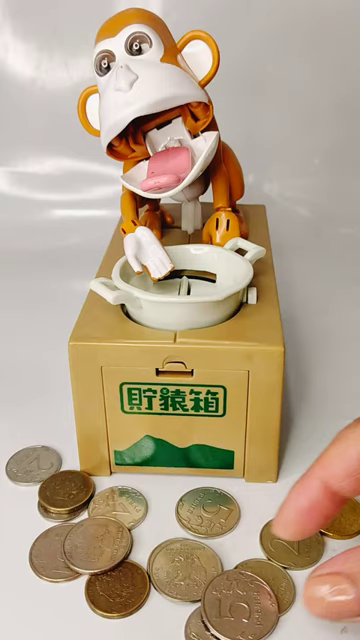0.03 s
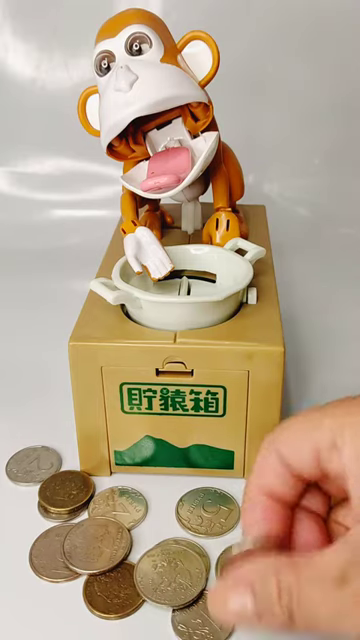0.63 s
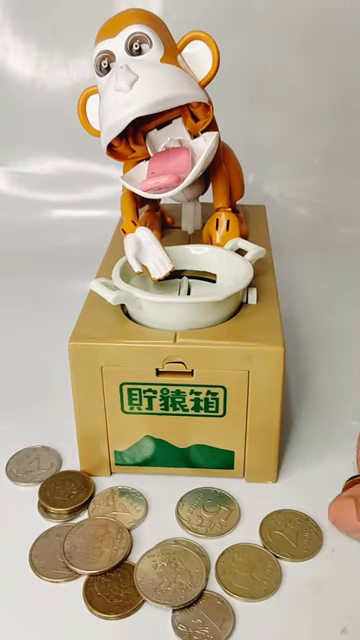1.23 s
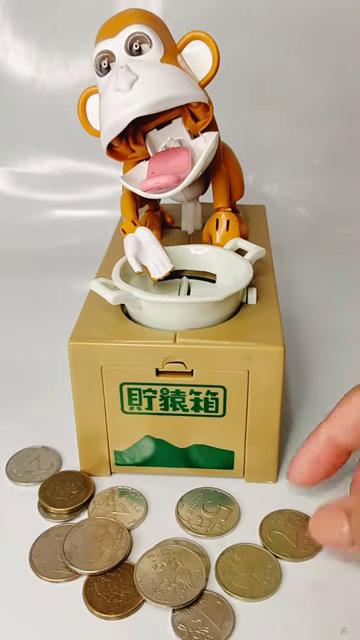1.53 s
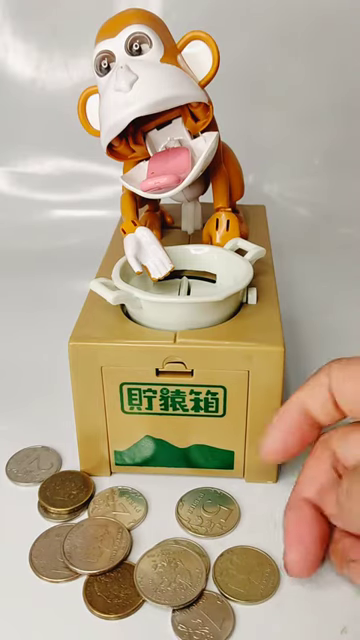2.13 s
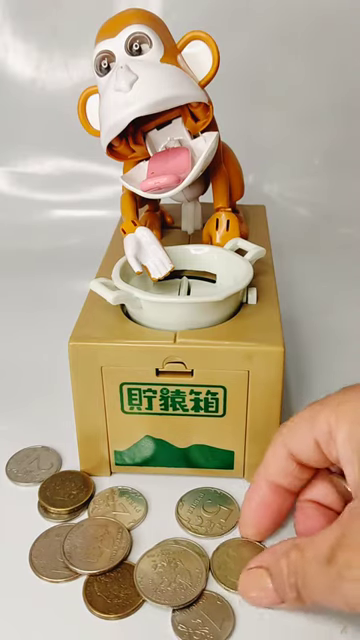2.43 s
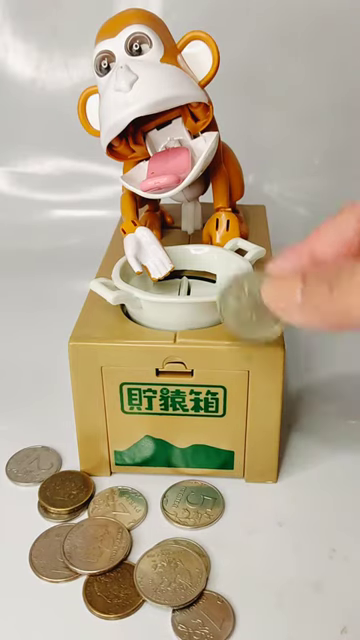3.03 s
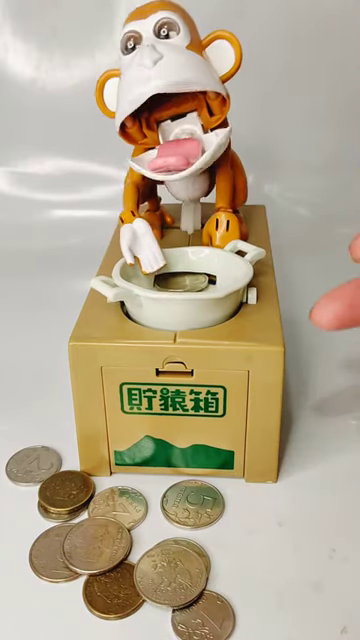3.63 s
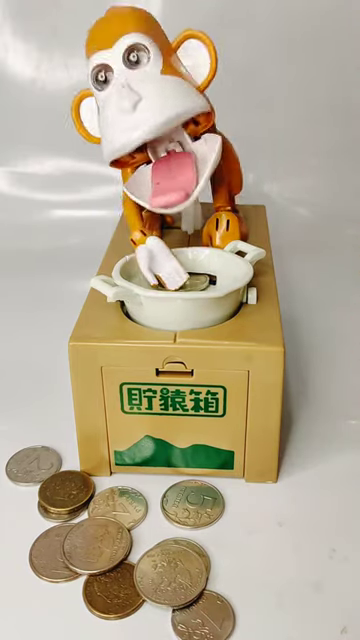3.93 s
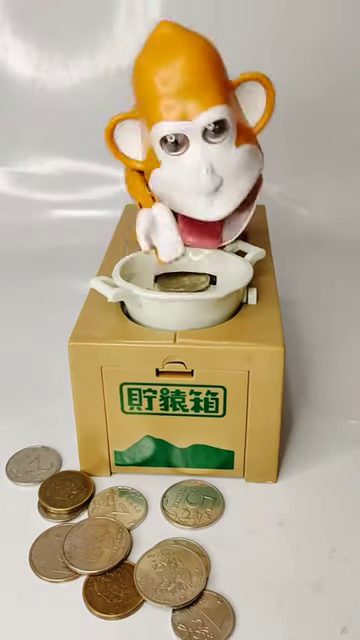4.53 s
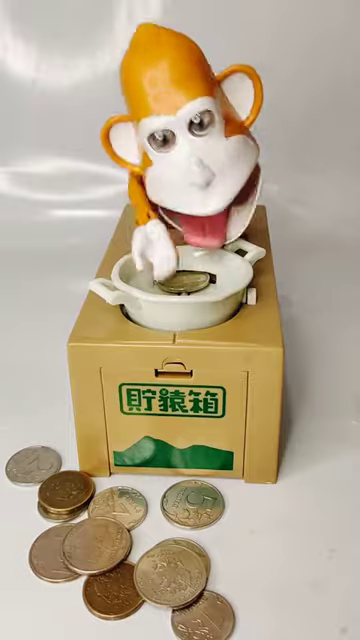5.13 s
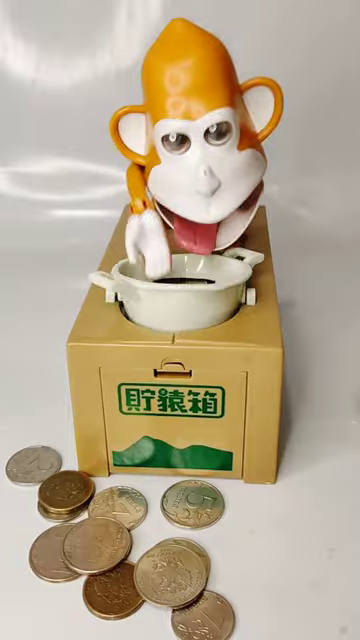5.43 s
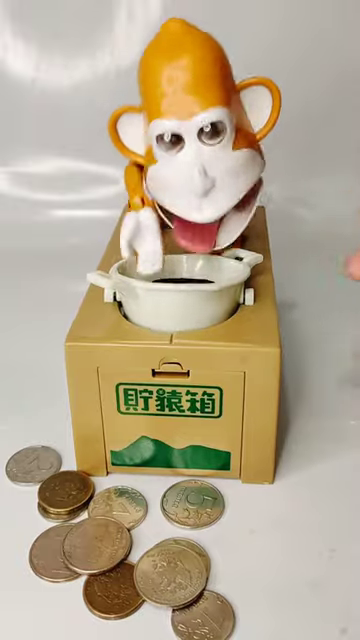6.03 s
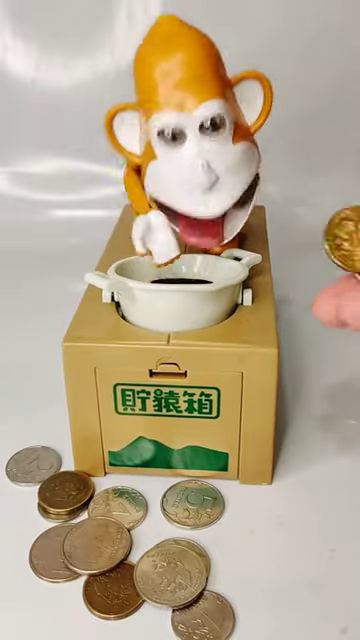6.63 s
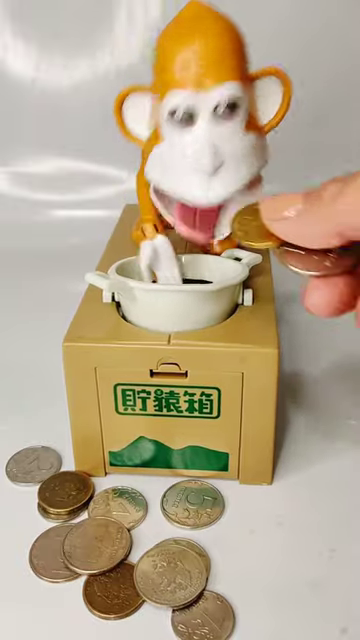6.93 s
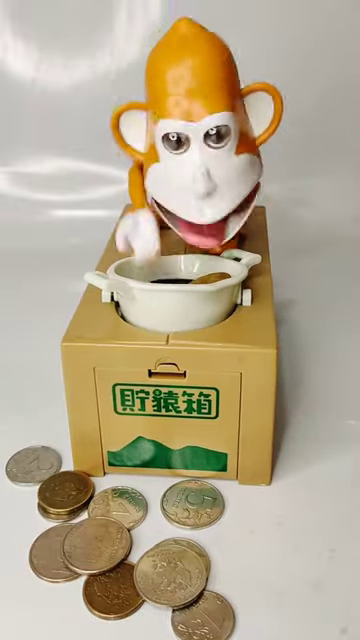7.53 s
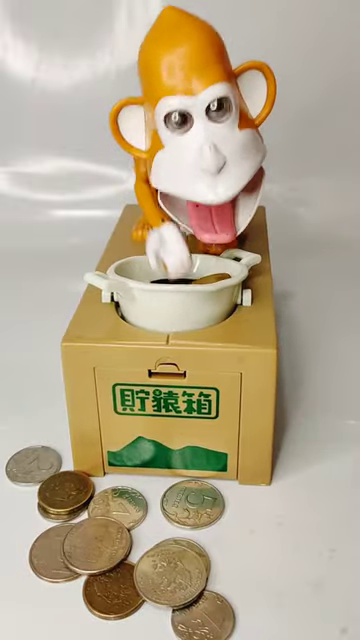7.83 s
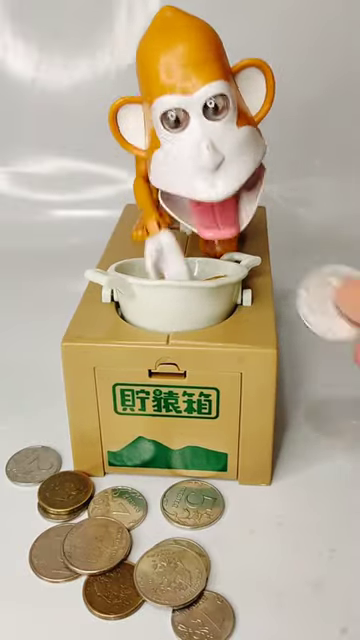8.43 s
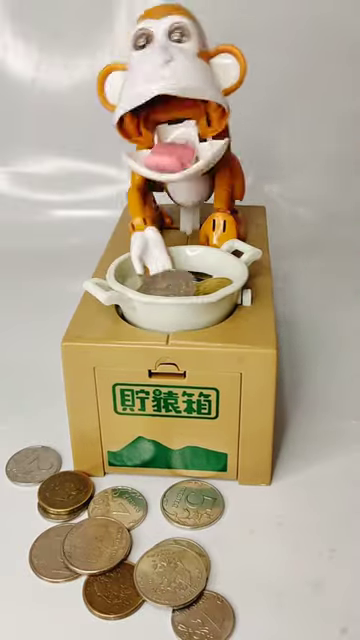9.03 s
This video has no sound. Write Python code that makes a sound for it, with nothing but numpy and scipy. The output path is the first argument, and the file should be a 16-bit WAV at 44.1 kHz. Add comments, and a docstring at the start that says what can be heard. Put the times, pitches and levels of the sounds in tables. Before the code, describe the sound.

Coins clink on a table, then drop into a plastic toy bank whose motor starts up, rattling, grinding and clacking.

```python
"""Coins into a motorised toy money box.

Coins clink in a heap on a hard table, then fall into a plastic dish, bounce and ring.
The first starts the motor: loose gears rattle in the hollow box and grind at each stroke of the figure.
Levers knock and more coins land; a phone stands close by in a small room."""
import sys
import numpy as np
from scipy import signal
from scipy.fft import rfft, irfft
from scipy.io import wavfile
from scipy.ndimage import uniform_filter1d

SR = 44100
rng = np.random.default_rng(int(sys.argv[2]) if len(sys.argv) > 2 else 0)


def put_to_file(sound):
    """Save the sound as 16-bit audio at rate SR, in the file named by the first command-line argument."""
    columns = np.atleast_2d(sound).T  # one column per channel
    safe = np.clip(columns, -1, 1)
    whole_steps = np.round(safe * 32767)
    wavfile.write(sys.argv[1], SR, whole_steps.astype(np.int16))


N = 410130
TOP_HZ = 14200
TIME = np.arange(N) / SR
FREQ = np.maximum(np.linspace(0, SR / 2, 4097), 1)

# coin hits in the heap: start_s, level_db, chatter_s, ring_db
CLINKS = [(0.2658, -14, 0.0053, -8), (0.3123, -5.5, 0.0022, -2.5), (.614, -19.5, 0.0035, -10),
          (0.64, -21.5, 0.002, -8), (0.8357, -16, 0.0036, -3), (0.846, -17.5, 0.0062, 4),
          (0.864, -25, 0.0036, 7), (0.877, -17.5, 0.0039, 3), (.909, -19, 0.0015, 5),
          (0.958, -27.5, 0.01, 4), (0.974, -10.5, 0.0011, -7.5), (0.9822, -24, 0.00093, -6),
          (1.007, -25, 0.005, -9), (1.111, -32, 0.001, -15), (1.32, -27.5, 0.0041, -20),
          (1.4244, -9, 0.0017, 3), (1.467, -5, 0.0015, 4), (1.478, -32, 0.009, 6), (1.542, -36, 0.082, -13),
          (1.592, -17, 0.008, -2), (1.929, -26.5, 0.0022, -19), (2.0932, -15, 0.0094, 1.5),
          (2.142, -12.5, 0.0038, -1), (2.149, -10.5, 0.0023, -11), (2.246, -24, 0.009, -25),
          (2.267, -24.5, 0.0036, -20), (2.867, -39.5, 0.0049, -20)]
# small coin modes: pitch_hz, level_db, t60_s
SMALL_COIN_MODES = [(8700, -14, .15), (9950, -11, .12), (12870, 0, .11), (13030, -2, .09), (13200, -9, .06)]
# spectrum of a hit on plastic: freq_hz, gain_db
PLASTIC_SPECTRUM = [(100, -0.5), (800, -3), (1100, -5.5), (2500, 0), (4500, 0), (7000, 5.5), (9500, 13.5),
                    (11500, 8), (14000, -3.5)]
# dish resonances: centre_hz, width_hz, gain_db
DISH_RESONANCES = [(521.4, 48, 2.5), (709, 56, 3), (774, 53, 8.5), (855, 34, 9.5), (1190, 84, -1),
                   (1430, 640, -10)]
# hollow box resonances: centre_hz, width_hz, gain_db
BOX_RESONANCES = [(51.6, 20, -12.5), (107.4, 12, -3), (186.4, 8.6, 4), (211, 13, -5), (244.8, 16, -2),
                  (279, 5.7, 2.5), (364.4, 39, -9), (437, 6.4, -12)]


def undb(db):
    """Decibels to gain."""
    return 10 ** (np.asarray(db) / 20)


def unit(x):
    """Scale to rms 1."""
    return x / np.sqrt(np.mean(x ** 2))


def span(start_s, t):
    """Samples of an event with time axis t."""
    return slice(int(start_s * SR), int(start_s * SR) + len(t))


def highpass(x, hz):
    """First-order high-pass."""
    return signal.lfilter(*signal.butter(1, hz, "high", fs=SR), x)


def band(x, hz, width_hz):
    """One steep-skirted resonance, output at rms 1."""
    b, a = signal.iirpeak(min(hz, TOP_HZ), max(hz / width_hz, .8), fs=SR)
    return unit(signal.lfilter(b, a, signal.lfilter(b, a, x)))


def curve(points):
    """Gain over FREQ from points of freq_hz, gain_db."""
    hz, db = np.transpose(points)
    return undb(np.interp(np.log(FREQ), np.log(hz), db))


def resonances(rows):
    """Gain over FREQ of resonances summed in power."""
    powers = (undb(2 * db) / (1 + ((FREQ / hz - hz / FREQ) * hz / width_hz) ** 2)
              for hz, width_hz, db in rows)
    return np.sqrt(sum(powers))


def colour(x, gain):
    """Minimum-phase filter, scaled to keep the power of white noise below TOP_HZ."""
    cepstrum = irfft(np.log(gain / np.sqrt(np.mean(gain[FREQ < TOP_HZ] ** 2))))
    cepstrum[1:len(gain) - 1] *= 2
    cepstrum[len(gain):] = 0
    impulse = irfft(np.exp(rfft(cepstrum)))
    return signal.oaconvolve(x, impulse[None], axes=1)[:, :N]


def ring(x, modes):
    """Contacts in x excite decaying modes."""
    t = TIME[:SR // 2]
    tone = sum(undb(db - 60 * t / t60_s) * np.sin(2 * np.pi * hz * t) for hz, db, t60_s in modes)
    return signal.fftconvolve(x, tone[None] / np.linalg.norm(tone), axes=1)[:, :N]


def wander(rate_hz):
    """Smooth random drift, rms 1."""
    hold = max(int(SR / rate_hz), 1)
    steps = np.repeat(rng.standard_normal(N // hold + 1), hold)
    return unit(uniform_filter1d(steps, hold)[:N])


def swells(rows):
    """Sum of Gaussian bumps in dB."""
    out = np.zeros(N)
    for middle_s, db, half_s in rows:
        near = slice(*np.searchsorted(TIME, [middle_s - 4 * half_s, middle_s + 4 * half_s]))
        out[near] += db * np.exp(-((TIME[near] - middle_s) / half_s) ** 2)
    return out


def contacts(size, rate_hz, spread_db, lag_s=.00009):
    """Tiny random impacts from scattered spots, each with its own lag to the two microphone ports."""
    count = int(size * rate_hz / SR) + 1
    at = rng.integers(0, size, count)
    force = rng.choice([-1, 1], count) * undb(spread_db * rng.standard_normal(count))
    lags = np.rint(lag_s * SR * rng.standard_normal((2, count))).astype(int)
    return unit(np.array([np.bincount(np.clip(at + lag, 0, size - 1), force, size) for lag in lags]))


def blows(rows, rate_hz, rise_s=.0005):
    """Each blow is a brief chatter of contacts; extra columns give copies weighted in dB."""
    out, t = np.zeros((len(rows[0]) - 2, 2, N + SR)), TIME[:SR // 8]
    for start_s, db, chatter_s, *copies_db in rows:
        fade = np.exp(-(t / chatter_s) ** 1.13) * (1 - np.exp(-t / rise_s))
        burst = contacts(len(t), rate_hz, spread_db=4) * fade
        burst *= np.linalg.norm(fade) / np.sqrt(np.sum(burst ** 2, axis=1, keepdims=True) + 1e-12)
        out[:, :, span(start_s, t)] += undb(db + np.array([0, *copies_db]))[:, None, None] * burst
    return out[:, :, :N]


def bounced(rows, gap_s, loss_db, count=2):
    """Follow each landing with ever quicker, weaker bounces."""
    out = list(rows)
    for (start_s, db, *rest), jitter in zip(rows, rng.standard_normal((len(rows), count))):
        delays_s = np.cumsum(gap_s * .75 ** np.arange(count) * np.exp(.2 * jitter))
        out += [(start_s + late_s, db - loss_db * k, *rest) for k, late_s in enumerate(delays_s, 1)]
    return out


def air():
    """Faint room rumble common to both sides, plus separate hiss on each."""
    # room noise spectrum: freq_hz, gain_db
    spectrum = [(15, -34), (25, 8.5), (40, -5), (96, -14), (257, -19), (511, -27.5), (1640, -32.5),
                (3630, -32), (4480, -35), (10200, -30), (14000, -35.5)]
    rumble = signal.lfilter(*signal.butter(1, 600, fs=SR), rng.standard_normal(N))
    hiss = highpass(rng.standard_normal((2, N)), 600)
    return colour(rumble + hiss, curve(spectrum)) * undb(-53.5 + 1.2 * wander(36))


def table_taps():
    """Fingers and coin rims tap the table: quick knock, faint tail, low ring."""
    # taps: start_s, level_db, pitch_hz, ring_db
    taps = [(0.2634, -34, 150, -1), (0.2637, -33, 1800, 1), (0.313, -40, 1100, 6),
            (.611, -32.5, 1050, -2.5), (0.974, -42, 4440, -29), (1.828, -45, 200, -15),
            (1.925, -38, 1400, -13), (2.425, -51, 700, 7), (2.861, -34.5, 1270, 3.5)]
    # table top modes: pitch_hz, level_db, t60_s
    table_modes = [(282, -1.5, 0.23), (365, 3, 0.2), (540, -6, 0.25), (1120, -2, .15), (1640, -13, .12)]
    rise_s, knock_s, tail_s = .0012, .0054, .05
    knocks, drive, t = np.zeros((2, N)), np.zeros((2, N)), TIME[:SR // 3]
    fade = (np.exp(-t / knock_s) + undb(-13.5) * np.exp(-t / tail_s)) * (1 - np.exp(-t / rise_s))
    for start_s, db, hz, ring_db in taps:
        grit = contacts(len(t), 5000, spread_db=1.3)
        knocks[:, span(start_s, t)] += undb(db) * fade * band(grit, hz, width_hz=1.4 * hz)
        drive[:, span(start_s, t)] += undb(db + ring_db) * fade * grit
    return knocks + undb(-9) * ring(drive, table_modes)


def coin_heap():
    """Coins click together and ring briefly, damped by the heap."""
    # click spectrum: freq_hz, gain_db
    spectrum = [(150, -40.5), (1000, -41), (3000, -18.5), (5500, -9), (7500, -2.5), (9000, 6.5),
                (10200, 6.5), (11800, -4.5), (13000, 6.5), (13800, -2.5), (14200, -20.5)]
    hits, drive = blows(bounced(CLINKS, gap_s=.016, loss_db=11.5), rate_hz=12000)
    return undb(3) * colour(hits, curve(spectrum)) + undb(-6.5) * ring(drive, SMALL_COIN_MODES)


def struck_coins(pitch_spread=.067):
    """Each clink also rings the coin that was hit, each of a different size."""
    # struck coin modes: pitch_hz, level_db, t60_s
    modes = [(7600, -22, .045), (9600, -13, .05)]
    out, t = np.zeros((2, N)), TIME[:SR // 4]
    for start_s, db, *_ in CLINKS:
        detune = 1 + pitch_spread * rng.standard_normal()
        port_phase = np.pi * rng.standard_normal((2, 1))
        for hz, mode_db, t60_s in modes:
            tone = np.sin(2 * np.pi * hz * detune * t + port_phase)
            out[:, span(start_s, t)] += undb(db + mode_db - 60 * t / t60_s) * tone
    return out


def handling():
    """Coins and fingers scrape the table top, which gives a little under the hand."""
    # scrapes: middle_s, level_db, half_length_s, pitch_hz
    slides = [(0.455, -42.5, 0.03, 7900), (1.306, -43.5, 0.018, 1540), (1.922, -43.5, 0.0065, 1400),
              (2.032, -56.5, 0.13, 9600)]
    # hand thuds: start_s, level_db
    thuds = [(0.849, -35.5), (1.425, -35), (1.469, -27.5), (2.147, -35.5)]
    rise_s, decay_s, thud_hz = .00043, .14, 8
    out = np.zeros((2, N))
    for middle_s, db, half_s, hz in slides:
        near = abs(TIME - middle_s) < 3 * half_s
        scrape = band(contacts(near.sum(), 4000, spread_db=2.1), hz, width_hz=850 + .08 * hz)
        out[:, near] += undb(db) * scrape * np.exp(-((TIME[near] - middle_s) / half_s) ** 2)
    for start_s, db in thuds:
        t = TIME[:N - int(start_s * SR)]
        fade = (1 - np.exp(-t / rise_s)) * np.exp(-t / decay_s)
        out[:, span(start_s, t)] -= undb(db) * fade * np.cos(2 * np.pi * thud_hz * t)
    return out


def coin_drops():
    """A falling coin cracks on the plastic, rings and sets the dish booming."""
    # landings: start_s, level_db, chatter_s, large_coin_db, small_coin_db, boom_db, crack_db
    drops = [(3.3775, -9.5, 0.005, 10, -19, -2, -6.5), (3.4615, -17, 0.004, 21, -25, -13, -7),
             (3.471, -20.5, 0.013, 17.5, -25, -2, -8), (3.56, -36.5, 0.0023, -20, -23, 23, -8),
             (5.6615, -7.5, 0.0024, -22, -20, 8, 6.5), (5.679, -3, 0.0012, -14, -20, -15, 7.5),
             (5.811, -5, 0.0015, -16, -24, 0, 3), (5.833, -11, 0.0038, -5, -22, -12, -21),
             (7.2985, -14, 0.0052, -12, -12, 2.5, 2), (7.614, -5, 0.0026, -15, -22, -19, -10),
             (8.7615, -8, 0.003, -12, -6, -14, -12), (8.781, -9.5, 0.002, -15, -4, 2.5, -17),
             (9.0305, -15, 0.009, -14, -8, -1.5, -4), (9.23, -39.5, 0.0085, -12, 5, 18.5, -10)]
    # large coin modes: pitch_hz, level_db, t60_s
    large_coin_modes = [(8800, -14, 0.092), (9330, -5, .1), (9830, 10, 0.072), (10430, 2, 0.098),
                        (11500, 4, 0.06)]
    # stiff rim resonances: centre_hz, width_hz, gain_db
    rim_resonances = [(1470, 350, -0.5), (2100, 180, 4), (3680, 320, 5), (5230, 250, 3)]
    hits, large, small, boom, crack = blows(bounced(drops, gap_s=.037, loss_db=12.5), rate_hz=12000)
    clicks = undb(4.5) * colour(hits, curve(PLASTIC_SPECTRUM))
    coins = undb(-9.5) * ring(large, large_coin_modes) + undb(1) * ring(small, SMALL_COIN_MODES)
    dish = undb(-4.5) * colour(boom, resonances(DISH_RESONANCES))
    rim = undb(-6.5) * colour(crack, resonances(rim_resonances))
    return clicks + coins + dish + rim


def levers(rise_s=.00086):
    """Plastic links take up their play with a clack; heavier ones knock the hollow box."""
    # lever and jaw snaps: start_s, level_db, chatter_s
    snaps = [(3.9539, -18.5, 0.0036), (4.144, -16.5, 0.011), (4.2101, -8.5, 0.003), (4.405, -12.5, 0.0051),
             (4.4204, -9, 0.0015), (4.492, -17, 0.003), (5.118, -11.5, 0.003), (5.3196, -15, 0.0062),
             (5.6095, -14.5, 0.0037), (5.9313, -14, 0.0042), (5.874, -15, .006), (5.899, -13, 0.0021),
             (6.0256, -12.5, 0.0033), (6.1345, -3, 0.002), (6.146, -16, 0.0014), (6.207, -9, 0.0031),
             (6.2896, -14.5, 0.0034), (6.6373, -10.5, 0.0047), (6.6659, -6.5, 0.0035),
             (6.749, -11.5, 0.0046), (7.7348, -8, 0.0018), (7.9924, -11.5, 0.0038), (8.1289, -8.5, 0.0021),
             (8.2076, -10.5, 0.0036), (8.815, -17, .002)]
    # coin platform and housing clunks: start_s, level_db, pitch_hz, t60_s
    clunks = [(3.379, -17.5, 777, 0.089), (3.416, -20.5, 847, 0.07), (4.212, -16.5, 742, 0.034),
              (4.393, -23.5, 832, 0.11), (4.493, -23.5, 700, 0.062), (5.048, -23, 807, 0.094),
              (5.6615, -12, 550, 0.025), (6.019, -19, 822, 0.088), (6.309, -20.5, 793, 0.06),
              (6.62, -18.5, 850, 0.086), (6.797, -21, 750, 0.054), (6.949, -16, 810, 0.031),
              (7.25, -22, 855, 0.14), (7.307, -29, 824, 0.076), (7.578, -20.5, 840, 0.093),
              (7.7348, -19, 808, 0.067), (7.883, -17.5, 820, 0.048), (8.13, -17.5, 760, 0.05),
              (8.329, -22, 790, 0.075), (8.765, -18, 855, .05)]
    hits, = blows(snaps, rate_hz=10000)
    out = undb(6) * colour(hits, curve(PLASTIC_SPECTRUM))
    out += undb(-17) * colour(hits, resonances(DISH_RESONANCES))
    t = TIME[:SR // 4]
    for start_s, db, hz, t60_s in clunks:
        beating = np.sin(2 * np.pi * hz * t) + undb(-8.5) * np.sin(2 * np.pi * .88 * hz * t)
        out[:, span(start_s, t)] += undb(db - 60 * t / t60_s) * (1 - np.exp(-t / rise_s)) * beating
    return out


def motor():
    """Loose gear teeth clatter in bunches each shaft turn; load makes them grind and shakes the box."""
    # run-up, work, easing off: time_s, gear_db, box_db
    drive = [(3.57, -35, -52), (3.78, -30, -49.5), (4.05, -27.5, -46), (4.4, -26, -42.5),
             (4.92, -27.5, -41.5), (5.47, -25.5, -41.5), (5.63, -27, -45.5), (6.36, -24.5, -42.5),
             (6.6, -25, -41), (7.53, -26.5, -40.5), (8.82, -27, -44), (9.3, -29, -39.5)]
    # tooth clatter spectrum: freq_hz, gain_db
    gear_spectrum = [(300, -13.5), (600, -56), (1050, -15), (1400, -10.5), (1900, -6), (2350, -6),
                     (3000, -10), (4200, -5), (6000, -3), (7000, -1.5), (8300, 2), (10300, 1.5),
                     (12200, -5), (13200, -6.5), (14000, -26.5)]
    # figure's shell resonances: centre_hz, width_hz, gain_db
    shell_resonances = [(1390, 190, -4.5), (2360, 150, 3), (2700, 280, 1), (3047, 140, 0.5),
                        (3640, 330, -3), (4730, 250, -5), (5980, 330, 0)]
    # rotor hum carrying through the box: middle_s, boost_db, half_length_s
    hum_swells = [(4.03, 16.5, 0.14), (9.02, 19, 0.16)]
    start_s, rise_s = 3.385, .0062
    rotor_hz, shaft_hz, wheel_hz = 205, 88.3, 23.43
    time_s, gear_db, box_db = np.transpose(drive)
    gear_db, box_db = np.interp(TIME, time_s, gear_db), np.interp(TIME, time_s, box_db)
    load_db, dip_db = cam_load(), rattle_dips()
    speed = 1 + .0209 * wander(9) - .013 * load_db
    angle = 2 * np.pi * np.cumsum(speed) / SR
    turn_db = .31 * np.cos(shaft_hz * angle) + .76 * np.cos(wheel_hz * angle)
    bunch = unit(undb(turn_db + wander(260) + .34 * wander(45)))

    gears = colour(contacts(N, 3000, spread_db=2.7) * bunch * gear_skips(), curve(gear_spectrum))
    gears *= undb(gear_db + load_db + dip_db)
    shell = colour(contacts(N, 1800, spread_db=2.5) * bunch, resonances(shell_resonances))
    shell *= undb(gear_db + 1.02 * load_db + dip_db - 8.5)
    dish = colour(contacts(N, 600, spread_db=2.76, lag_s=.0001) * bunch, resonances(DISH_RESONANCES))
    dish *= undb(.59 * gear_db + .37 * load_db + .5 * dip_db - 20.385)
    shake = contacts(N, 260, spread_db=4.6, lag_s=.00018) * bunch
    shake *= undb(box_db + .19 * load_db + .5 * dip_db + 5.5)
    box = colour(shake, resonances(BOX_RESONANCES))
    hum = np.sin(rotor_hz * angle) * undb(-55.5 + swells(hum_swells) + 2 * wander(17))  # unbalance
    return (gears + shell + dish + box + hum) * np.clip((TIME - start_s) / rise_s, 0, 1)


def gear_skips(rate_hz=70, peak_s=.0014):
    """Clatter gain: at uneven gaps a gear skips and rasps for a few milliseconds."""
    count = int(rate_hz * N / SR)
    late, force = rng.random((count, 2)).T
    at = ((np.arange(count) + late) * N / count).astype(int)
    age = TIME[:SR // 25] / peak_s
    rasps = signal.oaconvolve(np.bincount(at, force ** 2, N), age * np.exp(1 - age))[:N]
    return unit(1 + undb(4) * rasps)


def cam_load(push_half_s=.028, swing_half_s=.0164, swing_after_s=.1):
    """Motor load in dB: each cam turn pushes the figure and lets it swing back."""
    # cam strokes: push_s, push_db, swing_db
    strokes = [(4.388, 7.5, 2.5), (4.583, 7, 2), (4.786, 7, 6), (4.968, 5.5, 4.5), (5.138, 6, 4),
               (5.333, 5.5, 3.5), (5.523, 5, 3.5), (5.877, 4.5, 0.5), (6.105, 5, 1.5), (6.275, 2.5, 2.5),
               (6.465, 5.5, 0.5), (6.655, 4, -1), (6.845, 7, 1), (7.049, 7, 0.5), (7.253, 7, 3.5),
               (7.435, 7.5, -0.5), (7.624, 6.5, -5.5), (7.821, 9.5, 2), (8.01, 7.5, -2.5), (8.21, 4.5, 5),
               (8.413, 7.5, 0), (8.62, 5, -2)]
    pushes = [(push_s, db, push_half_s) for push_s, db, _ in strokes]
    swings = [(push_s + swing_after_s, db, swing_half_s) for push_s, _, db in strokes]
    return swells(pushes + swings)


def jolts():
    """The figure's weight thumps the hollow box, softly enough to favour its low modes."""
    # thumps: start_s, level_db, chatter_s
    thumps = [(4.772, -20, 0.025), (4.87, -26.5, 0.022), (4.965, -24.5, 0.023), (5.12, -28, 0.023),
              (5.305, -24, 0.014), (5.5, -26, 0.025), (6.083, -18, 0.012), (6.455, -21, 0.017)]
    # soft landing spectrum: freq_hz, gain_db
    spectrum = [(120, 0.5), (190, -4), (400, -10.5)]
    hits, = blows(thumps, rate_hz=1500)
    return colour(np.array([hits[0], hits[0]]), resonances(BOX_RESONANCES) * curve(spectrum))


def rattle_dips(edge_s=.0032):
    """Level dips in dB: the gear rattle drops out abruptly for a moment, then returns."""
    # dips in the rattle: start_s, end_s, level_db
    dips = [(5.677, 5.757, -11), (6.121, 6.201, -19)]
    dip_db = sum(db * ((TIME > start_s) & (TIME < end_s)) for start_s, end_s, db in dips)
    return uniform_filter1d(dip_db, int(edge_s * SR) + 1)


def reflections(x, decay_s, pose_s=.07):
    """Quick echoes off close surfaces; the pattern shifts as hand and figure move."""
    hop, t = int(pose_s * SR), TIME[:SR // 16]
    padded, out = np.pad(x, ((0, 0), (hop, 2 * hop))), np.zeros((2, N + SR))
    window = np.sin(np.pi * np.arange(2 * hop) / (2 * hop))
    for start in range(0, N + hop, hop):
        pattern = rng.standard_normal((2, len(t))) * np.exp(-t / decay_s) * (t > .0006)
        piece = padded[:, start:start + 2 * hop] * window
        echo = signal.fftconvolve(piece, pattern / np.linalg.norm(pattern[0]), axes=1)
        out[:, start:start + echo.shape[1]] += echo
    return highpass(out[:, hop:hop + N], 1100)  # small surfaces reflect mostly treble


def room(x, tail_db, t60_s):
    """Add the small room's short, bright tail."""
    t = TIME[:SR // 2]
    tail = highpass(rng.standard_normal((2, len(t))) * undb(-60 * t / t60_s), 1100)
    return x + undb(tail_db) * signal.oaconvolve(x, tail / np.linalg.norm(tail[0]), axes=1)[:, :N]


def scene():
    """Gears echo in their housing, blows sound in the open; the toy reaches the left port later."""
    left_lag_s = .00012
    gears = motor()
    left, right = coin_drops() + levers() + jolts() + gears + reflections(gears, decay_s=.008)
    toy = np.array([np.roll(left, round(left_lag_s * SR)), right])
    near = coin_heap() + struck_coins() + handling() + table_taps() + toy
    near += undb(-10) * reflections(near, decay_s=.012)
    return room(near, tail_db=-11, t60_s=.29) + air()


def record(dry):
    """The phone colours each side by its port, fades in, rounds the peaks and cuts the top."""
    # unequal port resonances: freq_hz, left_minus_right_db
    ports = [(100, 4), (200, 4), (400, 4.5), (900, 2.5), (2500, 0.5), (5000, 0), (7500, -5.5), (8800, -6.5),
             (10300, 4.5), (13000, 2)]
    fade_in_s = .27
    sides = [colour(side[None], curve(ports) ** power)[0] for side, power in zip(dry, (.5, -.5))]
    sound = np.array(sides) * np.clip(TIME / fade_in_s, 0, 1) ** 2
    lowpass = signal.ellip(8, .2, 70, TOP_HZ, fs=SR, output="sos")
    return signal.sosfilt(lowpass, np.tanh(sound))


dry = scene()
out = record(dry)
put_to_file(out)
```